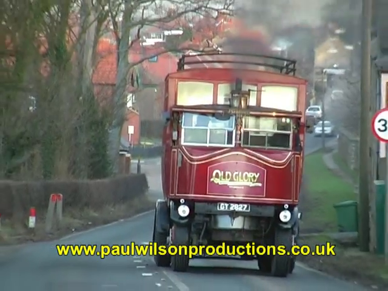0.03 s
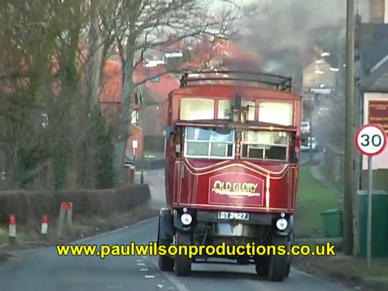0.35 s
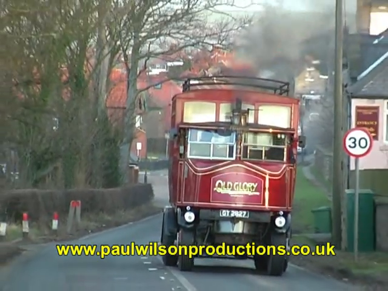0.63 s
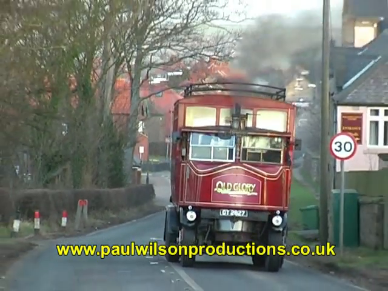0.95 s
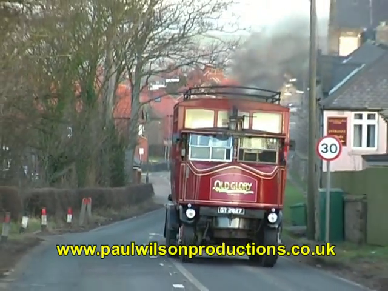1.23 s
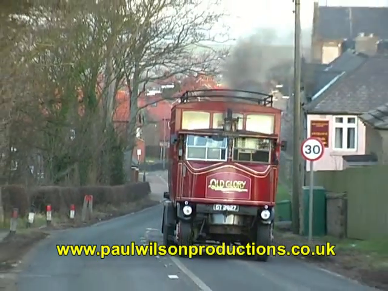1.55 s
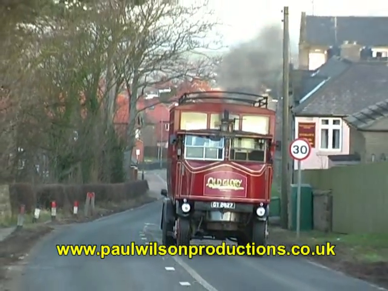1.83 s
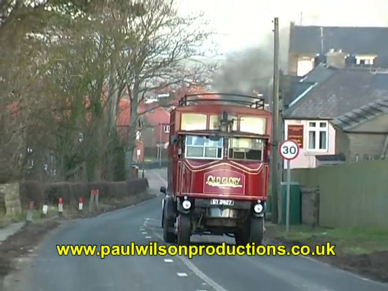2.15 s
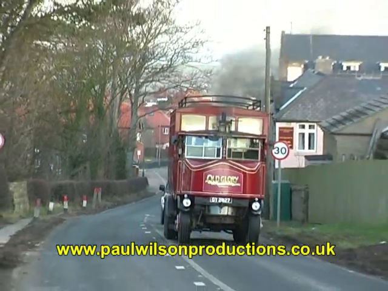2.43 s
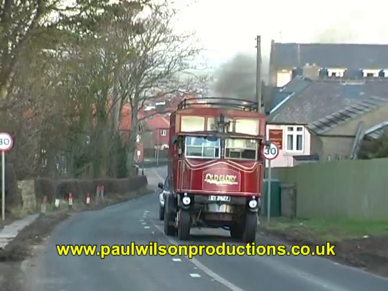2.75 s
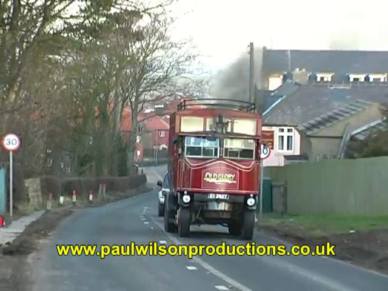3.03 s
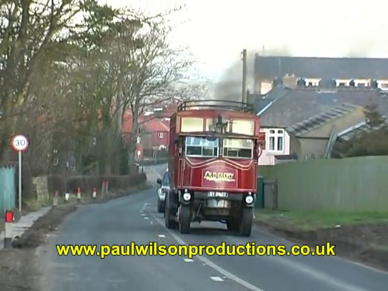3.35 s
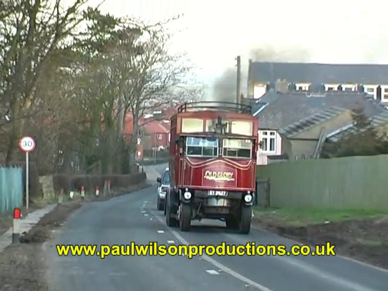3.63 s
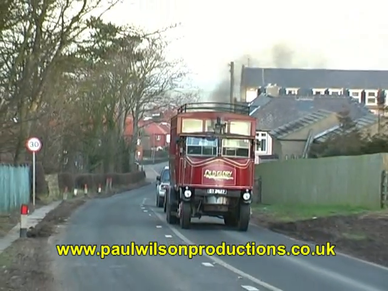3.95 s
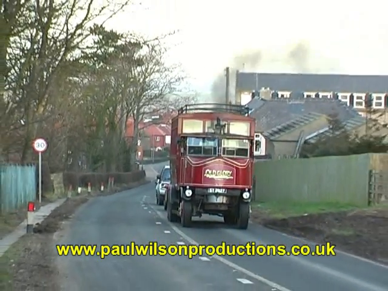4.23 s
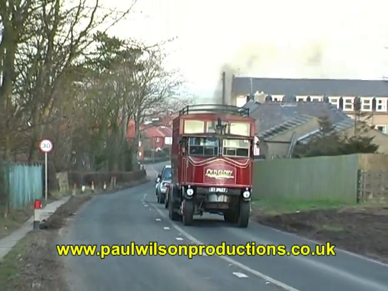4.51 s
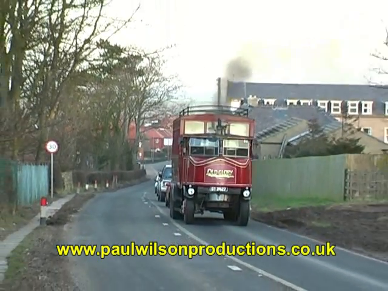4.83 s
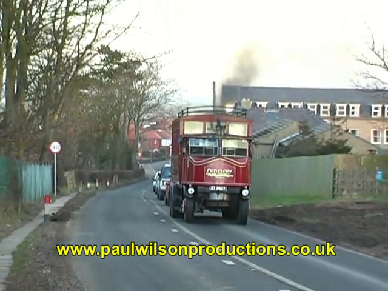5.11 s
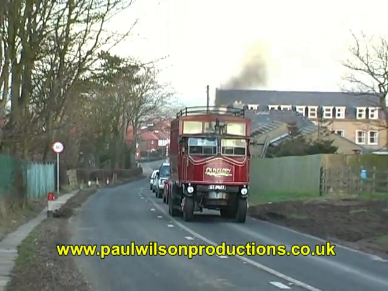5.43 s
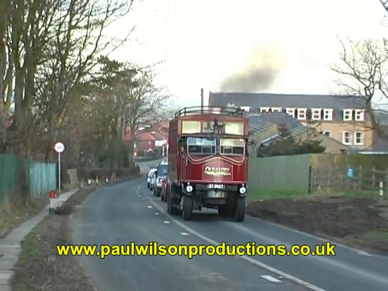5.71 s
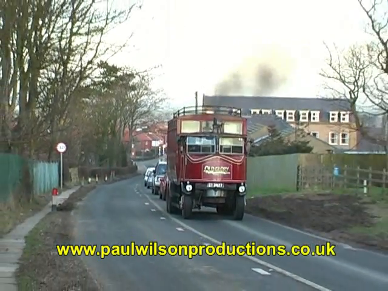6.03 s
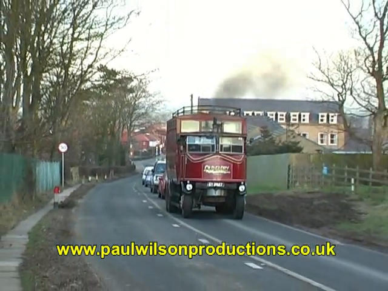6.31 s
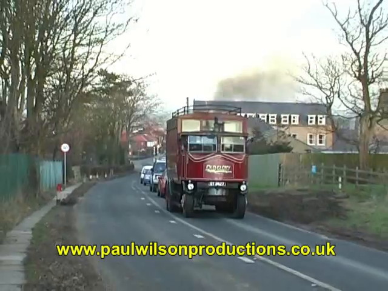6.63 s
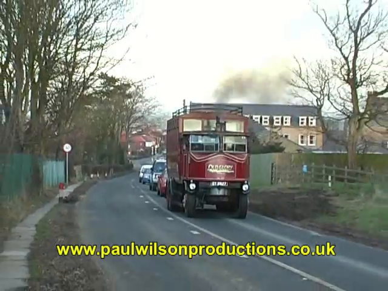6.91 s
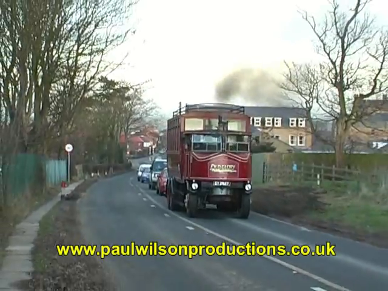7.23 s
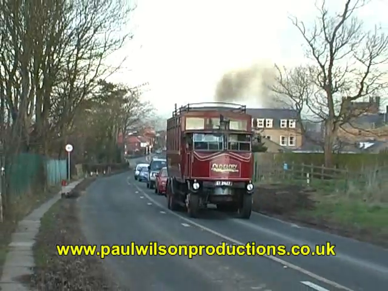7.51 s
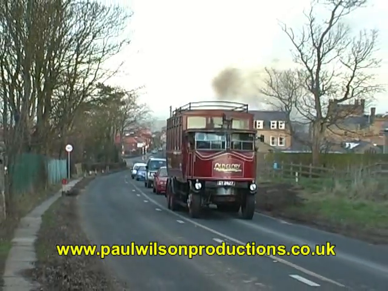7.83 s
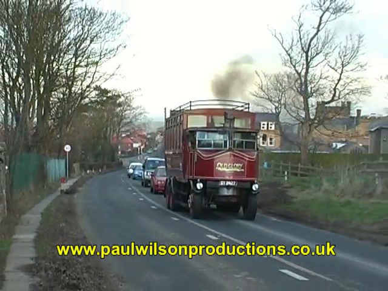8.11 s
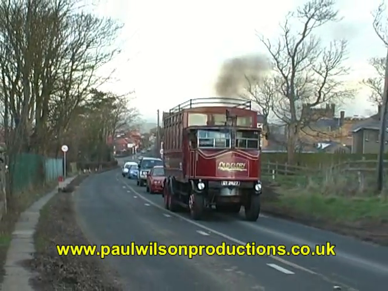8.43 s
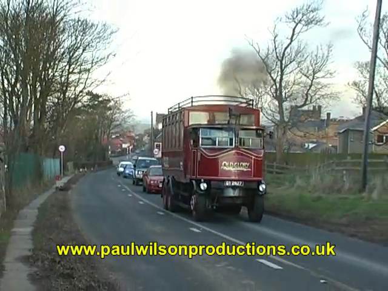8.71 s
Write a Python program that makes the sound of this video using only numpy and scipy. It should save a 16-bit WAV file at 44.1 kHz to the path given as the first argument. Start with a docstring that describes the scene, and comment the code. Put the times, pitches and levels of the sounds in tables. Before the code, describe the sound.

From the start, an old steam bus is heard outdoors from a vehicle just ahead. The loudest sound is its gear howl, one low, whistle-like note near middle C, steady in pitch and throbbing about seven times a second. It lasts all nine seconds, with tiny irregular dips. A broad steam hiss flutters above it, along with dense chassis rattle and faint metallic ringing. A low drone surges in short chuffs, mostly between 1.5 and 5 seconds. Tyres rumble underneath, growing a little, and rapid, muffled exhaust beats swell around 4, 6 and 7.7 seconds. Throughout, narrow breathy bands come and go in the hiss, sliding slowly downward with a phasing quality as the bus draws nearer. From about 6 seconds the hiss turns brighter, and after 8 seconds the howl weakens slightly while the steam carries on.

```python
"""Steam bus on a village road

An old steam bus, heard in stereo from a vehicle just ahead. Its drive gear howls on one low, whistle-like
note that throbs with every turn of the crank; the casing rings along. Steam hisses and the exhaust beats
below. As the bus draws nearer its reflections off the road lag more, and a comb of ridges slides down
through the hiss, some singing out for a while."""
import sys
import numpy as np
from scipy import signal
from scipy.fft import rfft, irfft
from scipy.io import wavfile

SR = 44100
rng = np.random.default_rng(int(sys.argv[2]) if len(sys.argv) > 2 else 0)


def wrap_up_sound(samples):
    """Save the sound to the file named by the first command line argument, as 16-bit audio."""
    columns = np.atleast_2d(samples).T
    # keep every value between -1 and 1, then stretch to whole-number steps
    tamed = np.clip(columns, -1, 1)
    steps = np.round(tamed * 32767).astype(np.int16)
    wavfile.write(sys.argv[1], SR, steps)


N = 395136
TIME_S = np.arange(N) / SR
TEETH, BEATS = 39, 4   # gear teeth and exhaust beats per turn of the crank

# Level of the drive's tooth rattle and of the body's drone: time_s, rattle_db, drone_db
DRIVE_LEVELS = [(0, -25, -24), (1, -24.5, -22.5), (2, -20.5, -29.5), (2.5, -22.5, -28), (3, -23, -30),
                (4, -23, -32), (4.9, -27, -31), (5.15, -23, -37), (6, -25, -34.5), (7, -26.5, -34),
                (8, -28, -36), (8.96, -33, -34)]


def from_db(db):
    """Decibels to gain."""
    return 10 ** (np.asarray(db) / 20)


def rms_one(x):
    """Scale to rms 1."""
    return x / np.sqrt(np.mean(x ** 2) + 1e-20)


def in_time(rows):
    """Each column of a timed table at every sample."""
    time_s, *columns = np.transpose(rows)
    return [np.interp(TIME_S, time_s, column) for column in columns]


def at_hz(points, hz):
    """Read a spectrum on a log-frequency axis."""
    point_hz, value = np.transpose(points)
    return np.interp(np.log(hz), np.log(point_hz), value)


def drift(rate_hz, step=40):
    """Smooth random wander with a spread of 1."""
    pole = np.exp(-2 * np.pi * rate_hz * step / SR)
    white = rng.standard_normal(N // step + 2002)
    slow = signal.lfilter([1], [1, -2 * pole, pole * pole], white)[2000:]
    return np.interp(np.arange(N) / step, np.arange(len(slow)), rms_one(slow))


def cycle(turns, peak_at=0):
    """A cosine that peaks at the given share of each turn."""
    return np.cos(2 * np.pi * (turns - peak_at))


def bumps(rows, half_s):
    """Bell-shaped changes of level in dB, one for each row."""
    return sum(db * np.exp(-np.minimum(((TIME_S - at_s) / half_s) ** 2, 20)) for at_s, db in rows)


def resonate(x, hz, width_hz):
    """One resonance; rms 1."""
    r = np.exp(-np.pi * width_hz / SR)
    return rms_one(signal.lfilter([1, 0, -1], [1, -2 * r * np.cos(2 * np.pi * hz / SR), r * r], x))


def noise(spectrum):
    """Stereo noise of a given colour, falling steeply beyond its ends; rms 1."""
    # How alike the two microphones hear it: frequency_hz, correlation
    likeness = [(30, .92), (60, 0.97), (130, 1), (330, 1), (480, 1), (650, 0.98), (1300, 1), (2600, 0.96),
                (5000, 0.93), (8500, 0.92), (13000, 0.82)]
    hz = np.maximum(np.arange(N // 2 + 1) * SR / N, 1)
    roll_off = (1 + (spectrum[0][0] / hz) ** 4) * (1 + (hz / spectrum[-1][0]) ** 4)
    alike = np.clip(at_hz(likeness, hz), 0, 1)
    mid, side = rfft(rng.standard_normal((2, N)))
    pair = np.sqrt(1 + alike) * mid + np.sqrt(1 - alike) * side * [[1], [-1]]
    return rms_one(irfft(pair * from_db(at_hz(spectrum, hz)) / roll_off, N))


def tooth_load(crank, slack_at=.053, slack_turns=.051, slip_teeth=.38):
    """The gear winds up through each turn, then goes slack: the load drops and it slips back."""
    past_slack = (crank - slack_at + .5) % 1 - .5
    strokes_db = .35 * cycle(3 * past_slack) + .85 * cycle(6 * past_slack)   # ripple from the pistons
    load_db = -5.5 * np.exp(-(past_slack / slack_turns) ** 2) - strokes_db
    windup_teeth = slip_teeth * (past_slack - .5 * np.tanh(past_slack / slack_turns))
    runout_teeth = .1 * cycle(crank, peak_at=.11)   # the wheel runs slightly off centre
    return load_db, windup_teeth + runout_teeth


def gear_howl(crank):
    """Teeth mesh at a multiple of the crank speed; the load swells the note and the wind-up bends it."""
    # Level of the howl: time_s, level_db
    levels = [(0, -15), (.15, -14), (.62, -15.5), (.78, -12.5), (1.28, -15), (1.4, -15), (1.55, -13),
              (2.8, -13), (4.65, -13.5), (5.5, -13.5), (6.1, -14), (6.22, -15), (6.4, -14), (7.6, -14.5),
              (7.9, -17), (8.3, -14.5), (8.6, -18.5), (8.75, -17.5), (8.96, -16.5)]
    # The howl dips briefly: time_s, depth_db
    dips = [(.525, 4), (.649, 10), (.9, 9), (1.2, 14), (1.4, 3), (1.953, 9), (5.522, 6), (6.114, 8),
            (6.558, 10), (7.603, 13), (7.995, 7), (8.566, 17), (8.876, 8)]
    load_db, lead_teeth = tooth_load(crank)
    mesh = TEETH * crank + lead_teeth + .04 * drift(19) + .038 * drift(.99)
    depth = 1 + .29 * drift(6.3)   # no two strokes unload the teeth alike
    note = np.sin(2 * np.pi * mesh) + from_db(-26) * np.sin(4 * np.pi * mesh)
    throbbing = rms_one(from_db(depth * load_db + .75 * drift(3.7)) * note)
    howl = from_db(in_time(levels)[0] - bumps(dips, half_s=.014)) * throbbing
    left = np.r_[howl[0], howl[:-1]]   # it reaches the right microphone a sample sooner
    return np.array([left, howl])


def drive_hum(crank):
    """Other turning parts hum on multiples of the crank speed, each wandering a little in phase."""
    # Weaker tones, against the mean level of rattle and drone: crank_multiple, level_db
    tones = [(21, -19), (27, -17), (33, -10), (34, -11), (36, -14), (46, -13), (66, -15), (69, -17),
             (70, -13), (78, -16), (81, -21)]
    rattle_db, drone_db = in_time(DRIVE_LEVELS)
    hum = 0
    for multiple, db in tones:
        wander = rng.random() + .16 * drift(.98)
        hum += from_db(db) * np.sqrt(2) * np.sin(2 * np.pi * (multiple * crank + wander))
    return from_db((rattle_db + drone_db) / 2) * hum


def rattle_and_drone(crank):
    """Teeth rattle and the body drones; both chuff once a turn, and each exhaust beat throbs the drone."""
    # Colour of the tooth rattle: frequency_hz, level_db
    rattle_colour = [(150, -37), (195, -17), (222, 2.5), (245, -6.5), (275, 0), (325, -2.5), (360, -11.5),
                     (420, -19.5), (600, -42)]
    # Colour of the body's drone: frequency_hz, level_db
    drone_colour = [(300, 3), (370, -2), (415, -6), (470, -1), (525, -0.5), (570, -18.5), (700, -35)]
    # Heavier chuffs of the drone: time_s, swell_db
    surges = [(.34, 2), (1.66, 3.5), (2.08, 6), (2.41, 7), (2.56, 2), (3.01, 6), (3.58, 7), (3.9, 3),
              (4.21, 2), (4.51, 5), (4.64, 5), (4.92, 3), (7.58, 2), (8.12, 4)]
    rattle_db, drone_db = in_time(DRIVE_LEVELS)
    chuff = cycle(crank, peak_at=.14)
    rattle = from_db(rattle_db + .8 * chuff) * noise(rattle_colour)
    throb_db = 1.8 * cycle(BEATS * (crank - .13)) * (1 + .47 * drift(9))
    swell_db = 1.8 * chuff + bumps(surges, half_s=.038) + throb_db
    return rattle + from_db(drone_db + swell_db) * noise(drone_colour)


def clatter(crank):
    """The chassis rattles densely, and the gear casing rings a little harder at each tooth."""
    # Resonances of the casing: pitch_hz, width_hz, level_db
    casing_modes = [(1015, 32, -16.5), (1083.5, 44, -10.5), (1292, 66, -15), (1413, 48, -14),
                    (2020, 35, -20), (2228, 23, -15), (2520, 36, -23), (2852, 33, -18), (2920, 25, -23),
                    (3045, 33, -26), (3820, 25, -24)]
    # Ringing of the casing: time_s, level_db
    casing_levels = [(0, -17), (2.4, -19), (4, -20.5), (5.2, -18.5), (6.5, -20), (7.6, -19), (8.96, -25)]
    # Colour of the chassis rattle: frequency_hz, level_db
    chassis_colour = [(300, 4), (450, -6.5), (560, 4), (660, -1.5), (770, -0.5), (1100, 0.5), (1400, 1.5),
                      (1700, -3), (1950, 0.5), (2300, -1.5), (2700, -6), (3200, -13), (4500, -24),
                      (8000, -43)]
    # Shaking of the chassis: time_s, level_db
    chassis_levels = [(0.0, -19.5), (2.22, -21), (2.34, -19), (2.54, -21), (3.89, -23.5), (4.77, -22),
                      (8.48, -21.5), (8.96, -21)]
    knocks = rng.standard_normal(N) * (1 + .76 * cycle(TEETH * crank))
    ringing = sum(from_db(db) * resonate(knocks, hz, width_hz) for hz, width_hz, db in casing_modes)
    casing = from_db(in_time(casing_levels)[0]) * ringing
    chassis = from_db(in_time(chassis_levels)[0]) * noise(chassis_colour)
    shake_db = .62 * cycle(crank, peak_at=.053) + .85 * drift(21)
    balance_db = np.array([[.34], [-.34]])   # a touch to the left
    return from_db(shake_db + balance_db - 2.03) * (chassis + casing)


def leak_flutter(crank):
    """Gain of the steam leak: it swells with each turn of the crank and with each exhaust beat."""
    turn_db = .471 * cycle(crank, peak_at=.053)
    beat_db = .87 * cycle(BEATS * crank, peak_at=.15)
    return from_db(turn_db + beat_db + 1.07 * drift(10))


def steam_leak(flutter):
    """Escaping steam makes a broad hiss with a fine spray on top."""
    # Strength of the leak: time_s, hiss_db, spray_db
    levels = [(0.0, -25.5, -45), (.33, -26.5, -43), (0.57, -30, -46), (.76, -27, -43), (1.07, -29, -42),
              (1.17, -28.5, -46), (1.59, -29.5, -48), (1.92, -30.5, -40), (2.35, -29.5, -44),
              (2.58, -31.5, -43), (3.17, -32, -42), (3.72, -29.5, -44), (3.9, -33.5, -44), (4.4, -33, -46),
              (4.85, -30.5, -41), (5.96, -30, -40.5), (6.31, -28.5, -34.5), (6.47, -30, -34.5),
              (6.57, -25.5, -35), (6.7, -29.5, -37.5), (7.16, -28, -38.5), (7.3, -28.5, -36.5),
              (7.88, -27, -36.5), (8.5, -27.5, -40), (8.63, -26, -37), (8.96, -28.5, -37)]
    # Colour of the hiss: frequency_hz, level_db
    hiss_colour = [(1500, -1), (3000, 1.5), (3800, 2), (4800, 0.5), (6500, 1.5), (8000, -2.5),
                   (10000, -11.5), (13000, -43)]
    # Colour of the spray: frequency_hz, level_db
    spray_colour = [(4000, -4), (7000, -0.5), (9000, 0.5), (10500, -2.5), (12000, -6), (13500, -25),
                    (15000, -30)]
    hiss_db, spray_db = in_time(levels)
    hiss = from_db(hiss_db + .2) * noise(hiss_colour)
    spray = from_db(spray_db + 4) * noise(spray_colour)
    return flutter * (hiss + spray)


def tyres():
    """Tyres rumble on the road."""
    # Strength of the rumble: time_s, level_db
    levels = [(0, -33), (3.2, -30.5), (5, -28.5), (6.8, -28.5), (7.5, -30.5), (8.96, -30)]
    # Colour of the rumble: frequency_hz, level_db
    colour = [(25, -17), (38, -26), (52, -21), (70, -8.5), (100, -3), (140, -4), (190, -0.5), (300, 2.5),
              (600, -73)]
    return from_db(in_time(levels)[0] + 4.5) * noise(colour)


def exhaust(crank):
    """Four uneven puffs a turn boom in the chimney."""
    # Draught up the chimney: time_s, level_db
    draught = [(0, -43), (1.3, -42), (2.2, -34.5), (3.8, -39), (4.2, -28), (4.48, -45), (4.8, -30),
               (5.03, -41), (5.63, -27), (5.78, -34), (6.15, -25), (6.4, -35), (7.35, -31.5), (7.5, -36),
               (7.75, -28), (8.15, -35.5), (8.85, -33), (8.96, -35)]
    puffs = np.maximum(cycle(BEATS * crank + .014 * drift(17)), 0) ** 2
    flow = puffs * (1 + .45 * drift(20))
    boom = resonate(resonate(flow, hz=86, width_hz=15), hz=82, width_hz=21)
    return from_db(in_time(draught)[0] - 3) * boom


def long_path_ms(far_ms=.765, near_ms=1.35, meeting_s=15):
    """Lag of the longer path off the road: it grows as one over the distance, which closes steadily."""
    nearness = TIME_S / (meeting_s - TIME_S)
    return far_ms + (near_ms - far_ms) * nearness / nearness[-1]


def off_the_road(sound, echoes, bounces=3):
    """Sound bounces between road and bus by two paths, raising ridges that sink as the paths lengthen."""
    # The shorter path changes with the lie of the road: time_s, lag_ms
    short_path = [(0, .26), (.7, .3), (2.3, .335), (3.05, .425), (3.7, .57), (5.1, .595), (5.8, .73),
                  (7.5, .96), (8.96, 1.33)]
    n = np.arange(N)
    lags_ms = long_path_ms(), in_time(short_path)[0]
    for lag_ms, (far, midway, near, dullness) in zip(lags_ms, echoes):
        flicker = from_db(.45 * drift(2.7))
        strength = np.clip(np.interp(n, [0, N / 2, N], [far, midway, near]) * flicker, 0, .7)
        smear = dullness / 4
        bounce = sound
        for _ in range(bounces):
            dulled = [np.convolve(side, [smear, 1 - 2 * smear, smear], "same") for side in bounce]
            bounce = strength * np.array([np.interp(n - lag_ms * SR / 1000, n, side) for side in dulled])
            sound = sound + bounce
    return sound


def singing_ridges(flutter, fade_s=.029):
    """Narrow bands of the hiss slide down with the comb; each swells, holds and fades."""
    # Ridges that sing out: start_s, end_s, multiple_of_comb_spacing, width_hz, level_db
    ridges = [(-0.1, 0.25, 1.1, 490, -23.5), (-.2, 0.25, 3.0, 400, -29), (-0.5, .42, 5.9, 700, -40),
              (-.2, 1.12, 5.08, 560, -37.5), (.68, 1.11, 2.3, 380, -29), (1.3, 2.2, 2.32, 260, -34),
              (.7, 1.12, 5.25, 1000, -36), (.65, 1.12, 3.04, 480, -35), (1.68, 2.2, 3.1, 600, -34),
              (2.1, 2.85, 5.2, 600, -39), (2.1, 2.9, 6.98, 500, -44), (2, 2.48, 1.15, 160, -29),
              (2.2, 3.7, 2.04, 500, -31.5), (3.3, 3.82, 5.08, 450, -43), (3.5, 3.86, 3.02, 550, -34),
              (3.8, 5.3, 3.02, 340, -35.5), (3.7, 5.2, 1.99, 360, -31.5), (4.55, 5.6, 4.92, 440, -41),
              (4.75, 5.5, 6.9, 600, -43), (4.65, 5.3, 8.2, 600, -45), (5.15, 6.1, 3.04, 360, -33.5),
              (5.2, 6.4, 1.85, 300, -33), (5.45, 6.25, 4.0, 400, -35), (5.6, 6.8, 1.16, 290, -31.5),
              (6.0, 6.5, 5.82, 400, -43), (6.1, 6.65, 6.95, 500, -40), (6.25, 7.0, 7.95, 550, -41),
              (6.3, 7.35, 3.92, 320, -38), (6.3, 7.4, 5.05, 400, -41), (6.0, 7.5, 3.14, 320, -37.5),
              (6.5, 7.9, 1.06, 300, -30.5), (7.8, 8.45, 1.01, 260, -28.5), (8.35, 9.2, .88, 280, -28.5),
              (8.35, 9.2, 1.94, 180, -33.5), (8.24, 9.4, 3.06, 280, -30), (8.5, 9.4, 2.99, 130, -31.5)]
    spurt = from_db(drift(12))   # they spurt a little more than the rest of the hiss
    spacing_hz = 1000 / long_path_ms()
    cycles = np.cumsum(spacing_hz) / SR
    white = rng.standard_normal((2, N))
    song = np.zeros(N)
    for k, (start_s, end_s, multiple, width_hz, db) in enumerate(ridges):
        span = slice(*np.searchsorted(TIME_S, [start_s - 10 * fade_s, end_s + 10 * fade_s]))
        rise = (1 + np.tanh((TIME_S[span] - start_s) / fade_s)) / 2
        fall = (1 + np.tanh((end_s - TIME_S[span]) / fade_s)) / 2
        own_noise = np.roll(white, k * N // len(ridges), axis=1)[:, span]
        slow = signal.sosfilt(signal.butter(4, width_hz / 2, fs=SR, output="sos"), own_noise)
        phase = 2 * np.pi * multiple * cycles[span]
        band = rms_one(slow[0] * np.cos(phase) + slow[1] * np.sin(phase))
        song[span] += from_db(db) * rise * fall * band
    return flutter * spurt * song


def widen(sound, start_db=2, db_per_s=.79):
    """Left and right differ more as the bus draws nearer the microphones."""
    mid = sound.mean(axis=0)
    return mid + (sound - mid) * from_db(start_db + db_per_s * TIME_S)


def scene():
    """One crank times the gear, clatter, steam and exhaust; the tyres rumble underneath."""
    # Speed of the engine: time_s, turns_per_s
    speed = [(0, 6.7347), (1.3, 6.7006), (3.6, 6.689), (5.2, 6.7348), (6.8, 6.7575), (8.96, 6.8082)]
    # Clatter off the road, long path then short: far_gain, midway_gain, near_gain, dullness_0_to_1
    clatter_echoes = [(0.24, 0.22, 0.096, 0.9), (0.057, 0.21, 0.097, .8)]
    # Steam off the road, long path then short: far_gain, midway_gain, near_gain, dullness_0_to_1
    steam_echoes = [(0.15, 0.27, 0.1, 0.69), (0.15, .17, 0.13, 1)]
    crank = np.cumsum(in_time(speed)[0]) / SR   # turns so far
    tones = gear_howl(crank) + drive_hum(crank)
    body = rattle_and_drone(crank)
    metal = clatter(crank)
    flutter = leak_flutter(crank)
    steam = steam_leak(flutter)
    low = tyres() + exhaust(crank)
    combed = off_the_road(metal, clatter_echoes) + off_the_road(steam, steam_echoes)
    return tones + singing_ridges(flutter) + widen(body + low + combed)


def record(dry, cutoff_hz=14200):
    """The top of the treble is cut steeply."""
    return signal.sosfilt(signal.ellip(10, .1, 90, cutoff_hz, fs=SR, output="sos"), dry)


dry = scene()
out = record(dry)
wrap_up_sound(out)
```